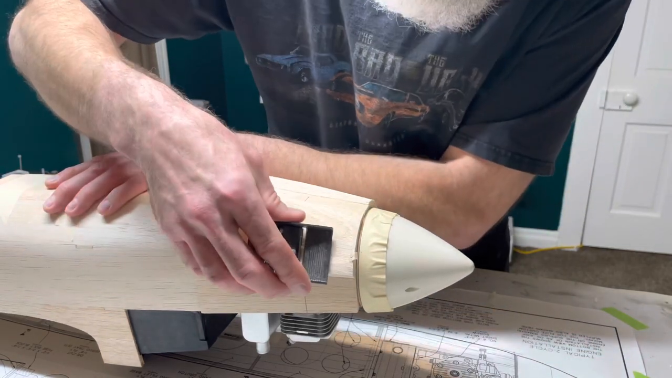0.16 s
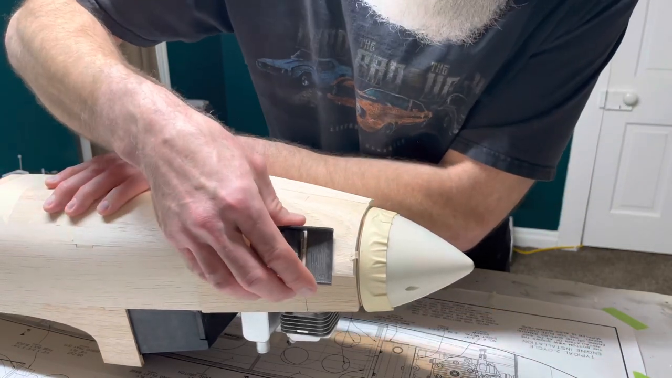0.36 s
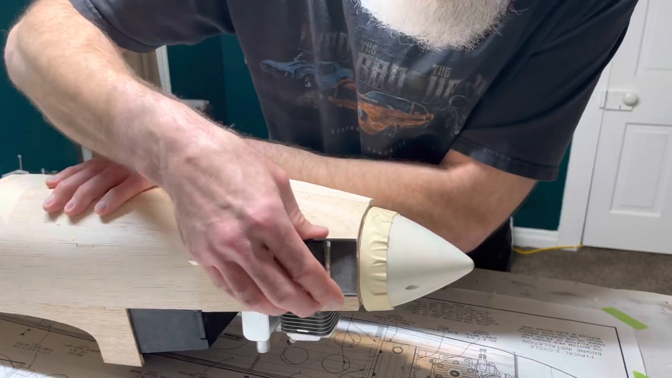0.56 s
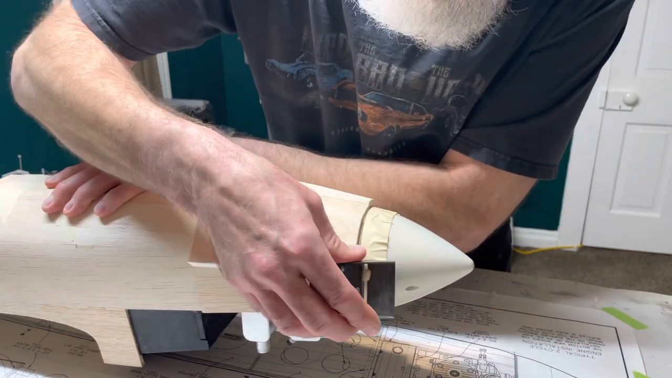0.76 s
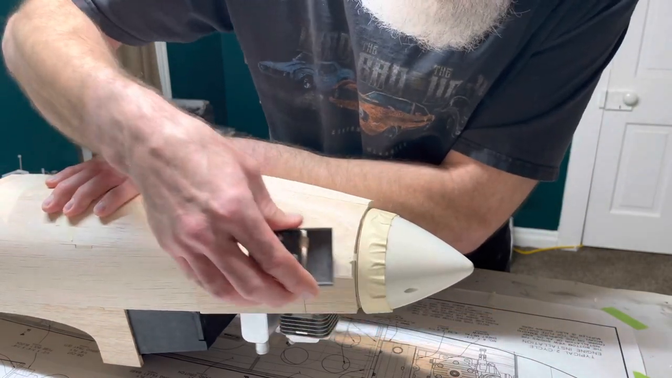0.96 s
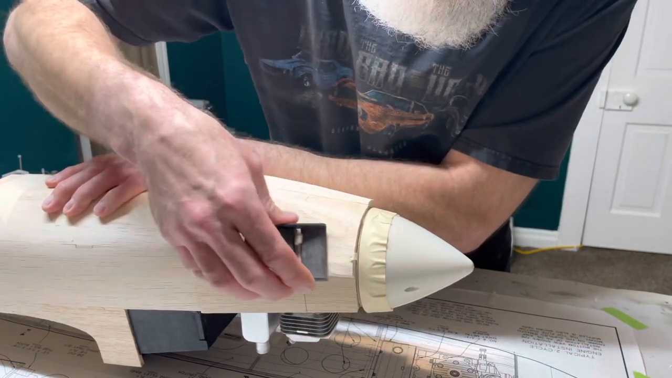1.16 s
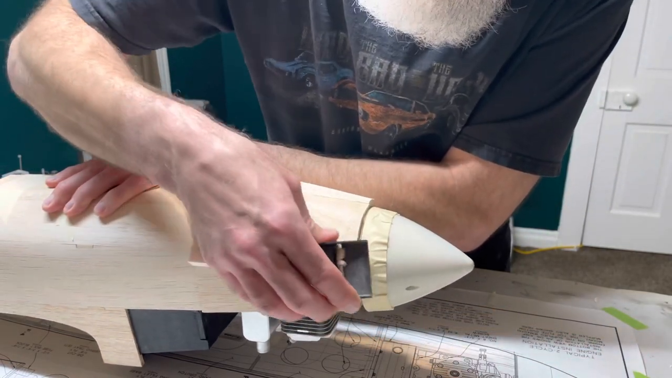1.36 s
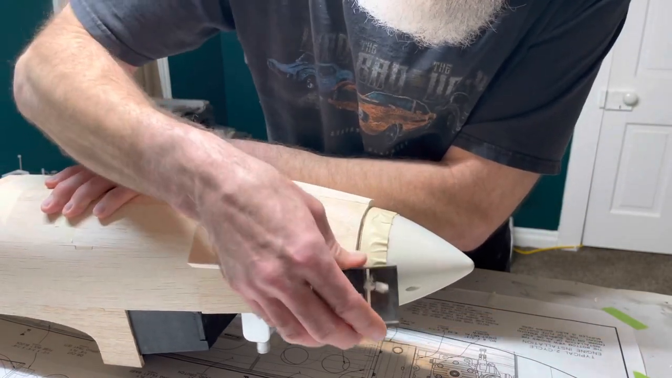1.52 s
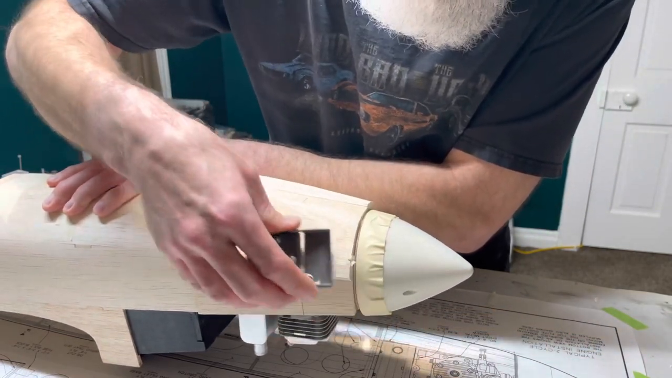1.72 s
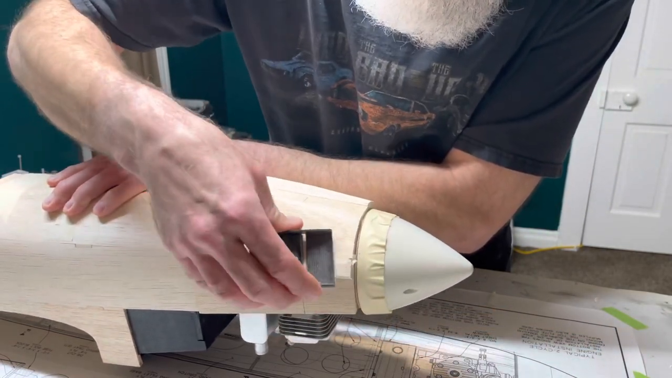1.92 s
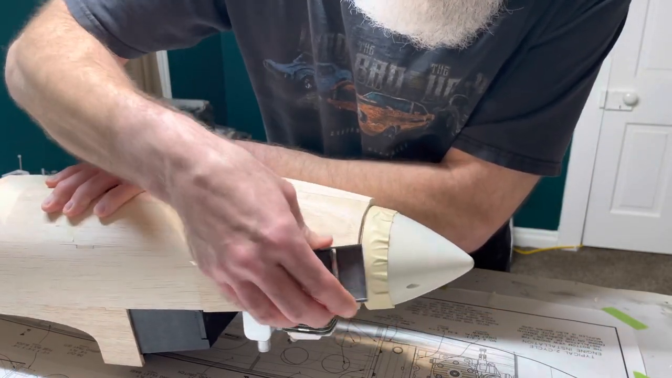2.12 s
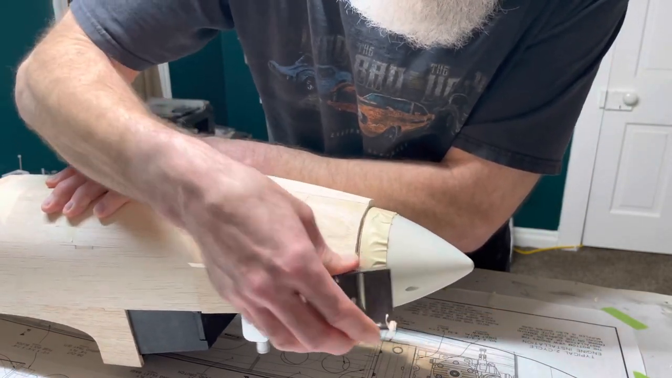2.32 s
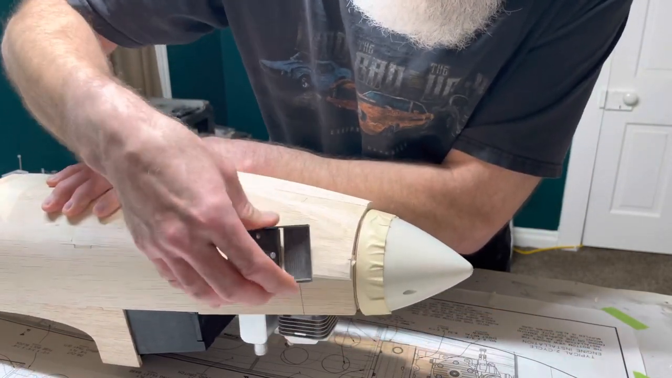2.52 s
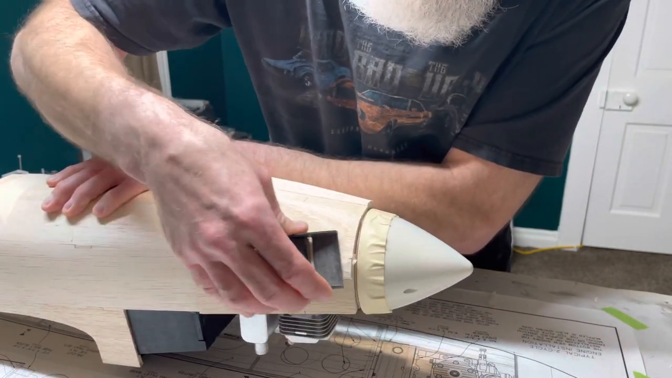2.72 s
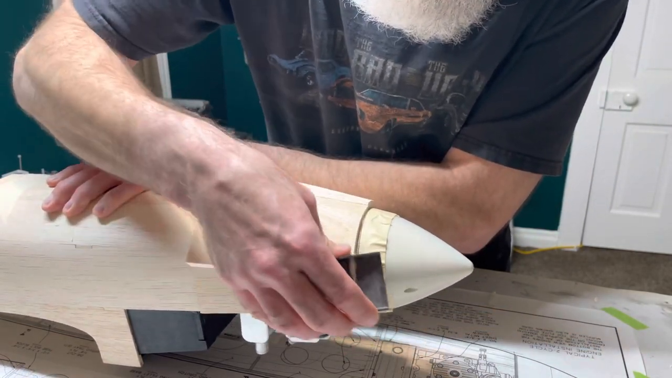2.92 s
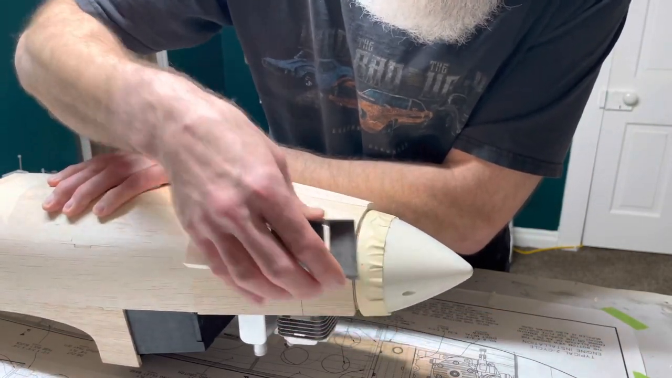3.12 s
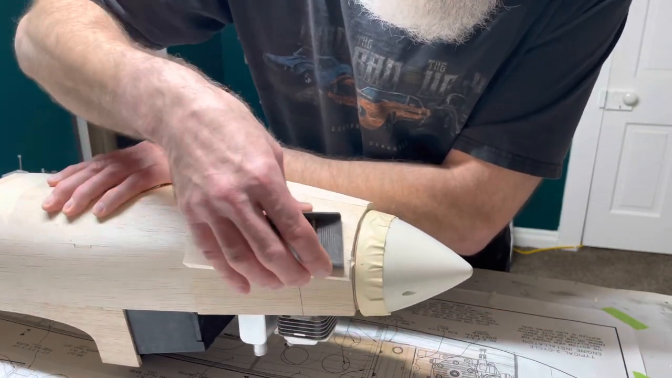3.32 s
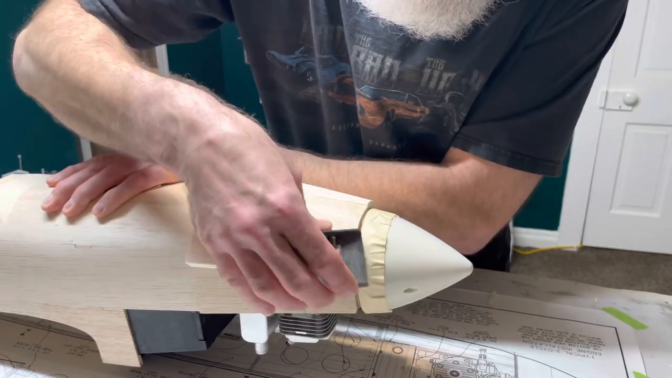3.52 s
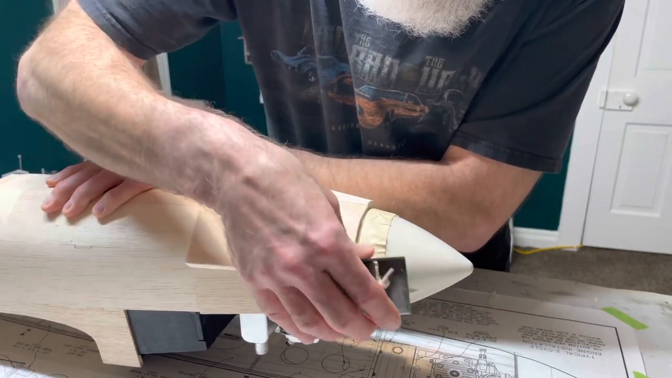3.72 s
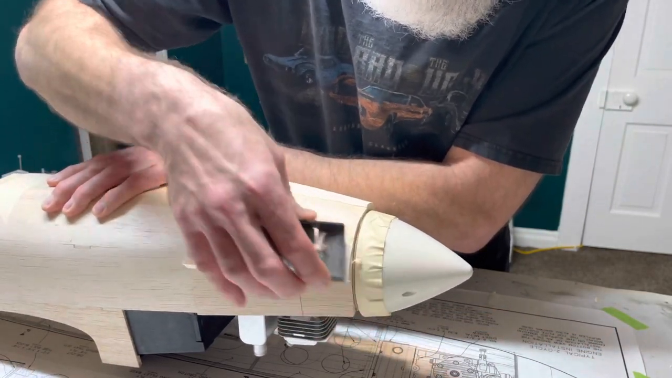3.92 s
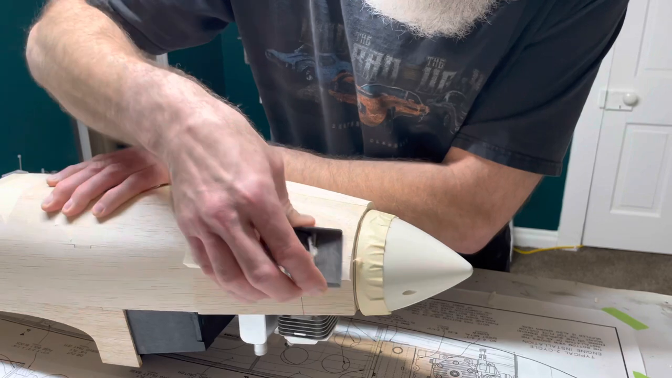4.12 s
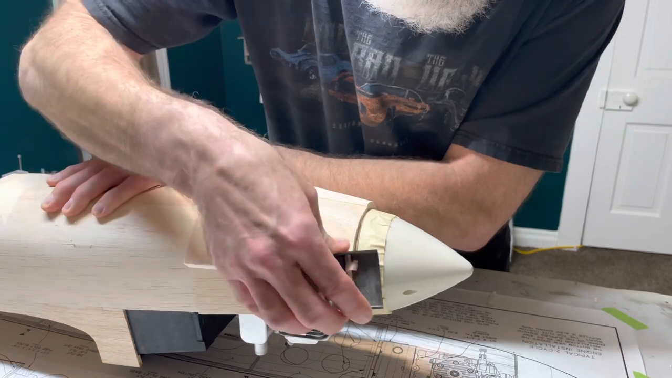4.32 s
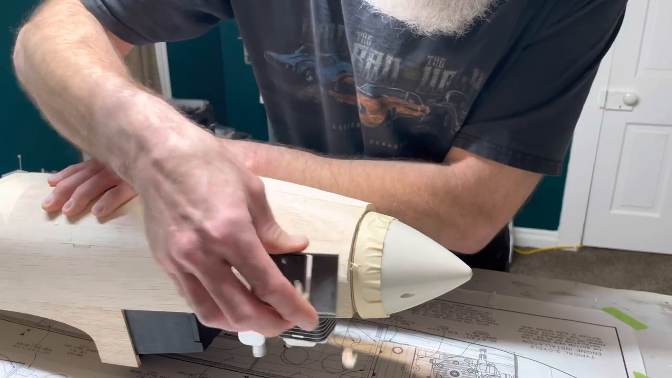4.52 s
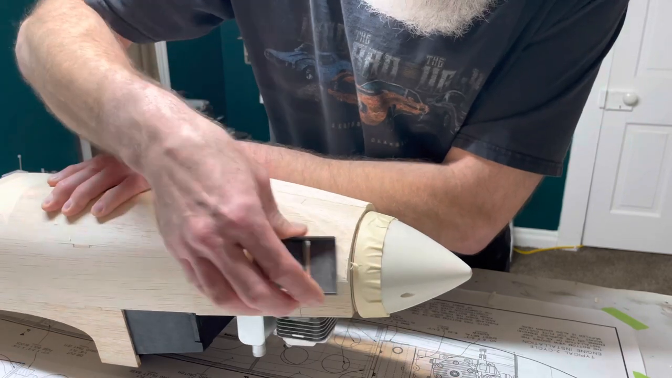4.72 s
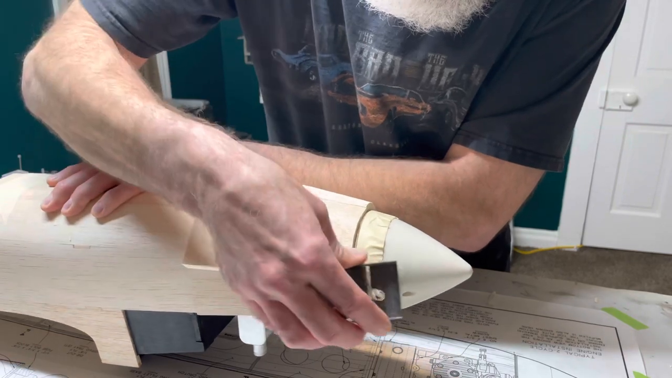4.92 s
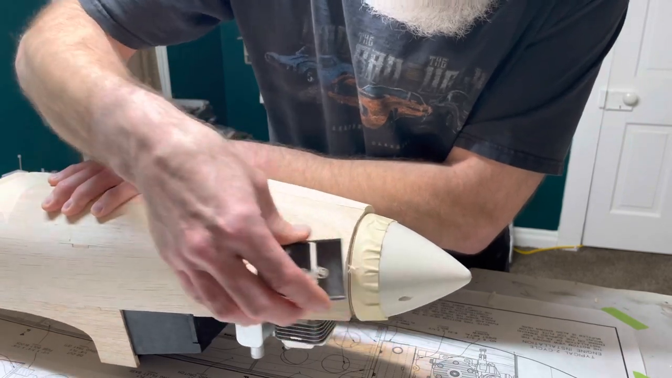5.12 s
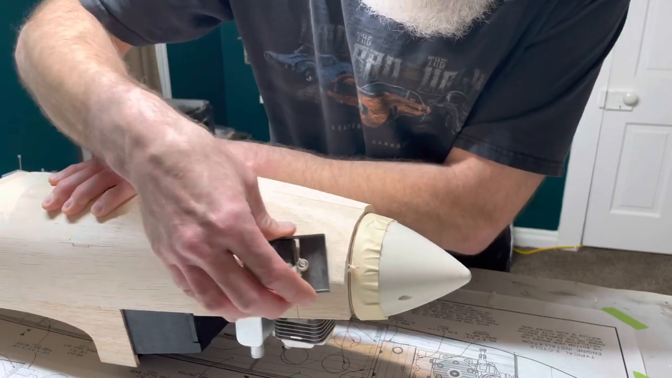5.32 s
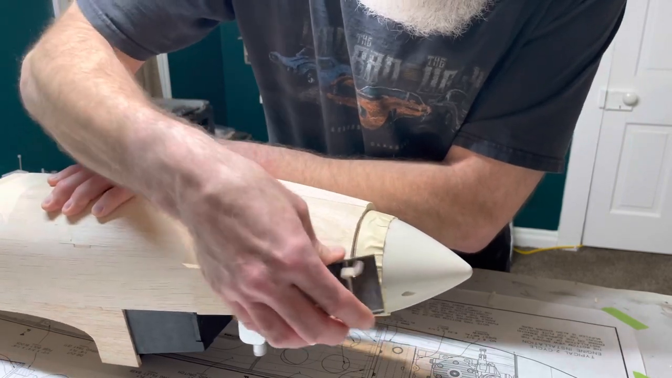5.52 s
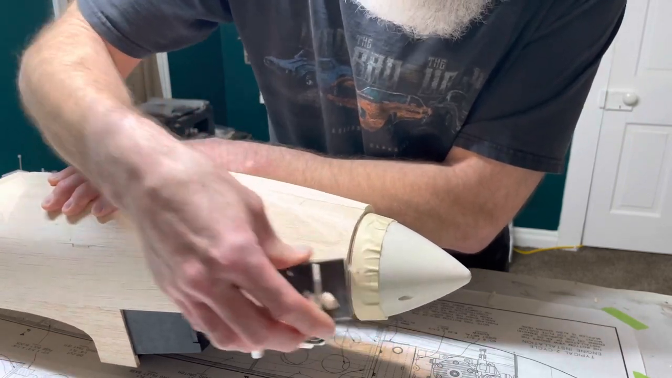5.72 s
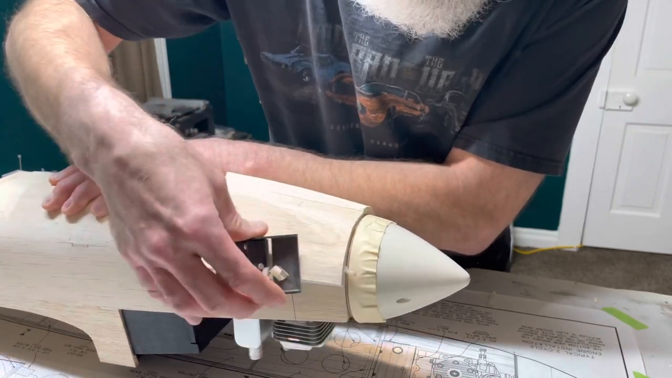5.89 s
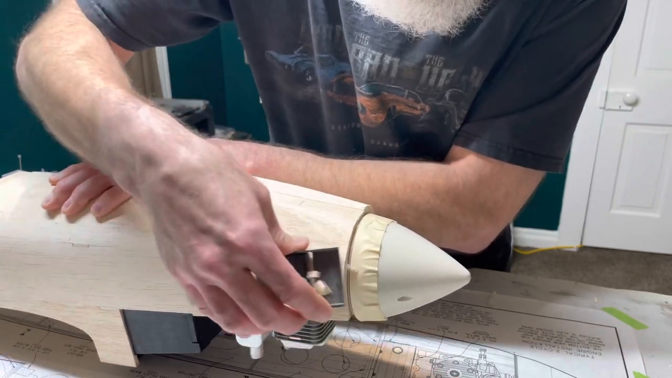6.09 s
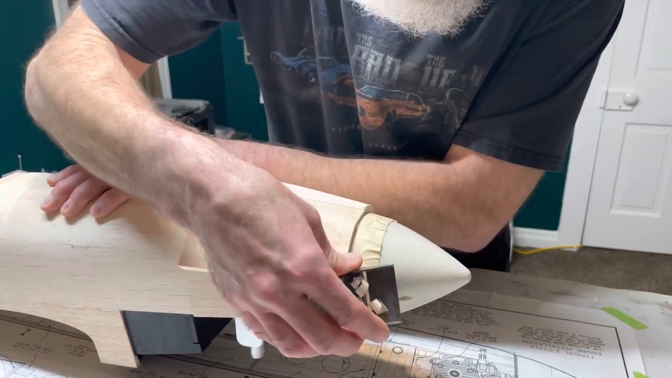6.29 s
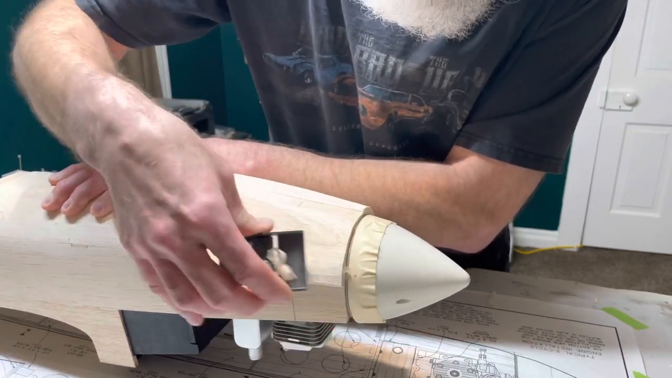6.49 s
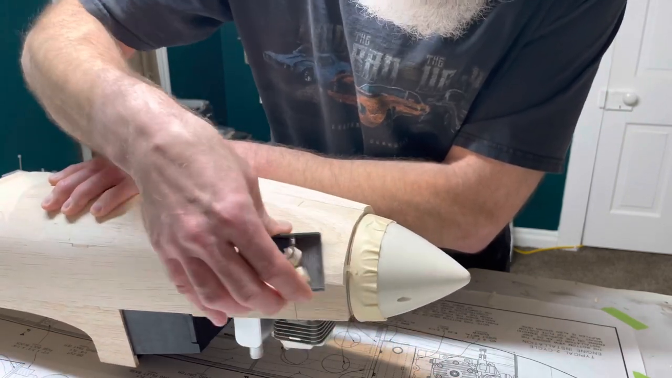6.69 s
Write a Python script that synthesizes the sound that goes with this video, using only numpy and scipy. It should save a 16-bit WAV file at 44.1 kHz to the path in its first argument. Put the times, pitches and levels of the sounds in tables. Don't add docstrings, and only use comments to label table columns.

```python
import sys
import numpy as np
from scipy import signal
from scipy.fft import rfft, irfft, next_fast_len
from scipy.io import wavfile
from scipy.ndimage import uniform_filter1d, map_coordinates

SR = 44100
rng = np.random.default_rng(int(sys.argv[2]) if len(sys.argv) > 2 else 0)


def store_wav(level_fs):
    pcm = np.round(np.clip(np.atleast_2d(level_fs), -1, 1) * 32767)
    wavfile.write(sys.argv[1], SR, pcm.T.astype(np.int16))


def boost(x):
    u = np.asarray(x, float) / 20
    return 10 ** u


N = 297675
TIME = np.arange(N) / SR


def noise():
    return rng.standard_normal((2, N))


def unit(x):
    return x / np.sqrt(np.mean(np.mean(x, axis=0) ** 2) + 1e-20)


def along(points, hz):
    f, *cols = np.transpose(points)
    return [np.interp(np.log(hz + 1), np.log(f + 1), c) for c in cols]


def wobble(rate):
    knots = rng.standard_normal(int(N * rate / SR) + 4)
    return map_coordinates(knots, [np.arange(N) * rate / SR])


def filtered(x, response):
    m = next_fast_len(N + 8192)
    return irfft(rfft(x, m) * response(np.fft.rfftfreq(m, 1 / SR)), m)[..., :N]


def coloured(x, points):
    return filtered(x, lambda f: boost(along(points, f)[0]))


def lift(peaks, f):
    return 1 + sum((boost(db) - 1) / (1 + (2 * (f - c) / w) ** 2) for c, w, db in peaks)


def patchy(x, depth_db):
    z = signal.stft(x, nperseg=1024)[2]
    field = uniform_filter1d(rng.standard_normal(z.shape), size=3, axis=1)
    field = uniform_filter1d(field, size=10, axis=2)
    return signal.istft(z * boost(depth_db * field / field.std()), nperseg=1024)[1][:, :N]


def ring(modes, t, near_hz=0, reach_hz=1e9, scatter_db=2):
    hz, db, t60 = np.transpose(modes)[:, :, None]
    luck = rng.standard_normal((2, 2, len(modes), 1))
    off_note_db = 6 * np.abs(hz - near_hz) / reach_hz
    size = boost(db + scatter_db * luck[0] - off_note_db - 60 * t / t60)
    phase = luck[1] * [[[0.15]], [[1.2]]]
    x = np.sum(size * np.sin(2 * np.pi * hz * t + phase), axis=1)
    return x / np.abs(x[0]).max()


def packet(t, hz, peak_s, half_s):
    return np.exp(-((t - peak_s) / half_s) ** 2) * np.sin(2 * np.pi * hz * t + [[0], [np.pi / 2]])


def attack(t, rise_s):
    return 1 - np.exp(-t / rise_s)


def piece(grain, s, t):
    return grain[:, round(s * SR):][:, :len(t)] / grain.std()


def add(track, s, x):
    part = track[:, round(s * SR):][:, :x.shape[1]]
    part += x[:, :part.shape[1]]


# f/Hz, level/dB
AIR = [(120, -21), (200, -14), (254, -18), (353, -3), (683, -6), (777, -12), (1160, -8), (2420, -19.5),
       (6880, -22.5), (16000, -39)]


def room_air():
    air = unit(coloured(patchy(noise(), depth_db=3.0), AIR))
    dull = filtered(air, lambda f: 1 / (1 + (f / 1600) ** 4) - 1 / (1 + (f / 330) ** 4))
    wakes_s, start_db = 0.31, -17
    held_db = start_db * np.clip(2 - 2 * TIME / wakes_s, 0, 1)
    return boost(-61) * (air + dull * (boost(held_db) - 1))


# f/Hz, level/dB
RUMBLE = [(13, -29), (22, -3.5), (54, 11), (103, 2.5), (130, -4), (166, -1), (194, 5), (220, -11),
          (290, -69), (480, -120)]
# f/Hz, width/Hz, level/dB
HUM = [(50.6, 37, 2), (80.4, 20, 1.5), (104, 3.7, 11.5), (149, 30, 7.5)]


def house_rumble():
    one, other = filtered(noise(), lambda f: boost(along(RUMBLE, f)[0]) * lift(HUM, f))
    rumble = unit(np.array([one + 0.31 * other, one - 0.05 * other]))
    settles_s, start_db = 0.51, -7
    swell_db = start_db * np.exp(-TIME / settles_s) + 1.0 * wobble(5.4)
    return boost(-58 + swell_db) * rumble


# t/s, f/Hz, level/dB
RUNDOWN = [(0, 168, -56), (.1, 173.4, -76.5), (.2, 168, -66), (.3, 133, -66), (.37, 101, -68),
           (.47, 98.3, -82), (.55, 91.2, -91)]


def rundown():
    s, hz, db = np.transpose(RUNDOWN)
    hz, db = np.interp(TIME, s, hz), np.interp(TIME, s, db)
    return boost(db + 6.0 + 2.0 * wobble(20)) * np.sin(2 * np.pi * np.cumsum(hz) / SR)


def whine():
    fade = np.clip((0.186 - TIME) / 0.08, 0, 1)
    return boost(-76 + 1.5 * wobble(25)) * fade * np.sin(2 * np.pi * 1140 * TIME)


def microphone_hiss():
    hiss = filtered(rng.standard_normal(N), lambda f: 1 / (1 + (7300 / (f + 1)) ** 6))
    return boost(-80) * hiss / hiss.std()


# deepest t/s, loss/dB, sinking/s
DUCKS = [(1.03, 2, 0.5), (1.75, -4.5, 0.092), (2.498, 3, 0.2), (3.733, 8, 0.017), (3.993, 18, 0.11),
         (6.39, 5, 0.13), (6.541, 5, 0.17)]


def ducking():
    loss_db = sum(db * np.clip(1 - (s - TIME) / slow, 0, 1) * (TIME < s) for s, db, slow in DUCKS)
    return boost(-loss_db)


# f/Hz, t60/s
ROOM = [(200, 0.45), (2000, 0.3), (6000, 0.2), (10000, 0.027)]


def room(x):
    hz, t, z = signal.stft(rng.standard_normal((2, SR // 2)), SR, nperseg=256)
    tail = signal.istft(z * boost(-60 * t / along(ROOM, hz)[0][:, None]), SR, nperseg=256)[1]
    late = np.pad(x[0], (300, 0))[None]
    return signal.fftconvolve(late, tail / np.linalg.norm(tail[0]), axes=1)[:, :N]


# f/Hz, likeness 0-1, left leads/rad, left louder/dB
PORTS = [(60, .97, 0, 0), (250, .7, .5, 3), (700, .6, .6, 5), (2000, .55, 1.1, 2), (2800, .6, 1.9, 2.5),
         (4000, .3, 3, 4.5), (7400, .3, 3.1, 4.5), (8400, .7, 3.14, 1.5), (9300, .93, 3.14, 0),
         (10100, .8, 2.8, 0), (10700, .75, 2.1, 0), (12000, .8, .7, 0), (12800, .99, 0, 0)]


def ports(pair):
    m = next_fast_len(N + 8192)
    alike, lead, louder_db = along(PORTS, np.fft.rfftfreq(m, 1 / SR))
    alike = np.clip(alike, 0, 1)
    a, b = rfft(pair, m)
    left = a * np.exp(0.5j * lead)
    right = (alike * a + np.sqrt(1 - alike ** 2) * b) * boost(-louder_db) * np.exp(-0.5j * lead)
    return irfft([left, right], m)[:, :N]


# t/s, level/dB, rise/s, t60/s
PUFFS = [
    (0.008, -70, 0.003, 0.053),
    (0.268, -70, 0.004, 0.19),
    (4.372, -42, 0.008, 0.05),
    (6.398, -63, 0.0012, 0.5),
]


def puffs():
    shape, t = np.zeros((1, N)), np.arange(SR // 3) / SR
    ticks = [(s - 0.0015, blade_db - 19, 0.0005, 0.0093) for s, _, blade_db in PANEL_HITS]
    for s, db, rise, t60 in PUFFS + ticks:
        fall_db = 60 * np.maximum(t - rise, 0) / t60
        add(shape, s, boost(db - fall_db)[None] * np.clip(t / rise, 0, 1))
    air = filtered(noise(), lambda f: 1 / (1 + (4000 / (f + 1)) ** 2) / (1 + (f / 14500) ** 10))
    return shape * air / air.std()


# start t/s, end t/s, lower note level/dB, upper note level/dB, dull scuff level/dB
RUBS = [(1.528, 1.758, -65.5, -77, -65), (2.298, 2.46, -60, -61.5, -61.5), (2.988, 3.163, -57, -58.5, -63),
        (3.346, 3.637, -57, -59, -58), (3.748, 3.94, -54, -57.5, -56.5),
        (4.357, 4.605, -65.5, -56.5, -57.5), (4.977, 5.138, -63, -59, -62), (5.661, 5.836, -65, -63.5, -71),
        (6.32, 6.36, -57, -52.5, -57)]
# f/Hz, width/Hz
RUB_NOTES = [(366, 6.6), (550, 42)]
# f/Hz, level/dB
SCUFF = [(80, -46), (160, -5), (300, 13), (600, -7), (1100, 10.5), (2500, -45)]


def rubs():
    out = np.zeros((2, N))
    notes = [unit(filtered(noise(), lambda f: 1 / (1 + (2 * (f - c) / w) ** 2))) for c, w in RUB_NOTES]
    notes.append(unit(coloured(noise() * boost(4 * wobble(30)), SCUFF)))
    for start, end, *levels in RUBS:
        fade = np.clip(np.minimum(TIME - start, end + 0.05 - TIME) / 0.027, 0, 1)
        on = fade > 0
        out[:, on] += fade[on] * sum(boost(db) * note[:, on] for db, note in zip(levels, notes))
    return out


# t/s, peak level/dB, favoured f/Hz, rattle level/dB
ROCKS = [
    (2.391, -25.5, 200, -17),
    (2.468, -42, 195, 12),
    (3.055, -31.5, 292, 4),
    (3.078, -23, 265, -3),
    (3.091, -26, 225, -18),
    (3.302, -26.5, 364, -1),
    (3.819, -23.5, 252, 0.5),
    (4.483, -22.5, 228, -3.5),
    (4.55, -30, 374, -16),
]
# f/Hz, level/dB, t60/s
STAND_MODES = [(100.7, -14, 0.65), (209.2, -9.5, 0.32), (283, -2.5, 0.06), (334, 2.5, 0.049),
               (396, -5.5, 0.28)]
# f/Hz, level/dB
RATTLE = [(250, -1), (450, -4.5), (900, 2.5), (1400, -31), (2500, -44)]


def rocks():
    out, t = np.zeros((2, N)), np.arange(SR // 3) / SR
    grit = coloured(noise() * boost(1.1 * wobble(90)), RATTLE)
    for s, db, hz, rattle_db in ROCKS:
        rattle = piece(grit, s, t) * (boost(-60 * t / 0.17) + 0.5 * boost(-60 * t / 0.015))
        knock = ring(STAND_MODES, t, near_hz=hz, reach_hz=65.4) * attack(t, 0.0031) ** 2
        thump = packet(t, 1.221 * hz, peak_s=0.0063, half_s=0.0031)
        knock = 0.91 * knock + 0.49 * thump
        add(out, s - 0.002, boost(db - 0.5) * (knock + boost(rattle_db - 16.0) * rattle * attack(t, 0.0053)))
    return out


# t/s, peak level/dB, t60/s, airy flick
# level/dB
RASPS = [(0.006, -57, 0.077, -25), (4.027, -46.5, 0.21, 0), (1.1144, -53, 0.17, 8.5),
         (1.565, -44, 0.18, -25), (1.8507, -48.5, 0.53, 3), (2.296, -37.5, 0.19, -7.5),
         (3.0006, -37, 0.14, -12), (3.7444, -36.5, 0.19, -9), (4.388, -38.5, 0.17, -8.5),
         (4.992, -40, 0.19, -12), (5.6775, -52, 0.3, -15), (6.334, -45.5, 0.12, -29)]
# f/Hz, level/dB
BREAK = [(600, -4), (1200, -1.5), (2000, 1.5), (2700, 5.5), (3500, 2), (5000, -4.5), (8000, -15),
         (15000, -38)]
# f/Hz, level/dB
BRIGHT = [(1500, -27), (2800, 5), (3500, 12.5), (5500, -8), (8000, -21), (15000, -40)]


def rasps():
    shape, t = np.zeros((3, N)), np.arange(SR // 3) / SR
    for s, db, t60, air_db in RASPS:
        body = boost(2.5 - 60 * t / t60) * (1 - 0.7 * np.exp(-t / 0.0065))
        flick = boost(air_db - 60 * t / 0.086)
        snap = boost(1.5 - 60 * t / 0.049)
        add(shape, s, boost(db - 2.0) * np.array([body, flick, snap]) * attack(t, 0.0008))
    grit = coloured(noise() * boost(0.85 * wobble(220)), BREAK)
    air = filtered(noise(), lambda f: 1 / (1 + (5000 / (f + 1)) ** 4) / (1 + (f / 13500) ** 10))
    bright = coloured(noise(), BRIGHT)
    return sum(envelope * x / x.std() for envelope, x in zip(shape, (grit, air, bright)))


# t/s, panel peak level/dB, blade peak level/dB
PANEL_HITS = [(0.1317, -60, -44), (1.035, -41, -38), (1.7543, -21, -29), (2.5062, -32, -35.5),
              (3.201, -22, -32.5), (3.999, -32, -53), (4.618, -20, -14.5), (5.196, -22, -23),
              (5.8628, -37, -30.5), (6.542, -28, -30)]
# f/Hz, level/dB, t60/s
PANEL_MODES = [(1080, -1, 0.04), (1136, 11, 0.063), (1100, 7, 0.081), (1330, 20.5, 0.0088)]
# f/Hz, level/dB, t60/s
BLADE_MODES = [(3378, -9, .06), (3700, -2, .014), (4100, -4, .01), (4850, -13, .025)]
# f/Hz, level/dB
CRACK = [(300, -31), (1500, 16), (4000, 13), (6500, 4.5), (9500, -11), (13000, -50.5), (16000, -80)]


def panel_and_blade():
    out, t = np.zeros((2, N)), np.arange(SR // 5) / SR
    grit = coloured(noise(), CRACK)
    for s, db, blade_db in PANEL_HITS:
        crack = piece(grit, s / 2, t) * (boost(-60 * t / 0.02) + 0.25 * boost(-60 * t / 0.13))
        click = (ring(BLADE_MODES, t) + 0.2 * crack) * attack(t, 0.002)
        add(out, s, boost(blade_db + 9) * click)
        add(out, s, boost(db + 1.0) * ring(PANEL_MODES, t) * attack(t, 0.00058))
    return out


# delay t/s, f/Hz, level/dB, half length/s
RETURNS = [(.0095, 350, 1, 0.0036), (0.027, 433, -4, 0.0065), (0.043, 430, -9.5, 0.0058),
           (0.053, 460, -14.5, 0.011), (.073, 430, -23.5, .005)]


def returns(t):
    delay, hz, db, half = np.transpose(RETURNS)[:, :, None]
    luck = rng.standard_normal((2, 2, len(RETURNS), 1))
    bell = np.exp(-((t - delay) / half) ** 2)
    wave = np.cos(2 * np.pi * hz * (t - delay) + luck[1])
    return np.sum(boost(db + 0.64 * luck[0]) * bell * wave, axis=1)


# t/s, peak level/dB, low modes level/dB, upper modes level/dB, favoured shell f/Hz
LANDINGS = [
    (0.133, -17.5, -5, -9, 740),
    (1.036, -24.5, 3, -6, 647),
    (1.754, -12, -8, -2, 713),
    (2.509, -12.5, -3.5, -5.5, 710),
    (3.202, -19.5, 0.5, -25, 740),
    (3.997, -21, -1.5, -25, 717),
    (4.619, -3.5, -18, 0.5, 672),
    (5.197, -11, -5, -7.5, 724),
    (5.864, -12.5, -2, -7, 707),
    (6.544, -10, -7, -1, 690),
]
# extra loss/dB per s, swell/s, reach of favoured note/Hz
GRIP = [(150, 0.0036, 41), (247, 0.0013, 72), (250, 0.0037, 47), (350, 0.0028, 60), (350, 0.0018, 39),
        (200, .002, 44), (110, 0.0024, 5.6), (247, 0.002, 30), (252, 0.0011, 33), (200, 0.0014, 48)]
# t/s, peak level/dB, low modes level/dB, favoured
# shell f/Hz
BOUNCES = [(1.7645, -18.5, -21, 660), (1.3, -34, -13, 560), (1.113, -40, 0, 740), (2.8, -38, -13, 640),
           (4.0245, -20.5, -5, 590), (4.643, -19.5, -7, 630), (5.208, -19.5, -26, 663),
           (5.256, -30, -6, 610), (5.884, -36, -16, 750), (4.8, -39, -7, 650), (3.3, -27.5, -8, 440),
           (5.4, -31, -10, 750), (4.664, -24, -20.5, 860), (4.674, -27.5, -29, 950), (4.1, -30, -23, 668),
           (6.596, -27, -10, 650), (1.816, -44, -10, 650), (3.25, -33, -2, 690)]
# extra loss/dB per s, swell/s, reach of favoured note/Hz
BOUNCE_GRIP = (290, 0.0014, 58)
# f/Hz, level/dB, t60/s
LOW_MODES = [(289, -25, 0.1), (320, 6, 0.1), (385, 9, 0.18), (316, -4, 0.16), (450, -6, 0.098)]
SHELL_MODES = [(545, -4, .1), (625, -2, .08), (660, -12, .2), (668, 0, .09), (740, 0, .055),
               (825, -2, .045)]
UPPER_MODES = [(1407, -11, 0.15), (1545, -5, 0.24), (1646, -4, 0.12), (1663, -5, 0.24), (1726, -4, 0.19),
               (1850, 11.5, 0.023), (1900, 12, 0.022), (2010, 4, 0.028), (2230, 0, 0.03),
               (2200, -17.5, 0.056)]
# f/Hz, level/dB
THUD = [(200, -14), (330, 3.5), (700, 14), (900, 2.5), (1200, -7), (1900, -7), (3000, -29.5)]


def taps():
    out, t = np.zeros((2, N)), np.arange(SR // 5) / SR
    wood = coloured(noise(), THUD)
    flutter = boost(3 * wobble(110) - 0.3)
    bounces = [(s, db, low_db, -15.5 - 0.35 * (db + 12), hz) for s, db, low_db, hz in BOUNCES]
    grips = GRIP + [BOUNCE_GRIP] * len(bounces)
    for (s, db, low_db, upper_db, hz), (grip, swell, reach_hz) in zip(LANDINGS + bounces, grips):
        shell = ring(SHELL_MODES, t, near_hz=hz, reach_hz=reach_hz, scatter_db=0) * attack(t, swell) ** 2
        ping = packet(t, hz, peak_s=0.004, half_s=0.0029)
        crush = piece(wood, s / 2, t) * boost(-60 * t / 0.18) * attack(t, 0.0013)
        shell = 0.73 * shell + 0.34 * ping + 0.14 * crush
        low = boost(low_db - 7.5) * ring(LOW_MODES, t) * attack(t, 0.0053)
        wave = boost(low_db - 9.5) * returns(t)
        upper = ring(UPPER_MODES, t, scatter_db=4) * attack(t, 0.002)
        upper = upper * flutter[round(s * SR / 2):][:len(t)] * boost(upper_db - 0.12 * grip * t)
        add(out, s - 0.0012, boost(db + 1.0) * (boost(-grip * t) * (shell + low) + wave + upper))
    return out


# start t/s, end t/s, level/dB, first f/Hz, last f/Hz
SINGS = [(0.392, 0.723, -53.5, 684, 740), (1.98, 2.06, -52, 664, 740), (2.138, 2.237, -43.5, 740, 807),
         (4.373, 4.405, -50, 648, 640), (4.749, 4.825, -40, 697, 677), (5.343, 5.547, -42, 680, 740),
         (5.994, 6.05, -44, 677, 715), (6.071, 6.154, -37, 685, 734), (6.186, 6.23, -39.5, 755, 733)]


def sings():
    out = np.zeros((2, N))
    waver = np.array([wobble(60), wobble(60)])
    flutter = boost(5.2 * np.array([wobble(49), wobble(49)]))
    for start, end, db, first_hz, last_hz in SINGS:
        fade = np.clip(np.minimum(TIME - start + 0.018, end + 0.013 - TIME) / 0.016, 0, 1)
        on = fade > 0
        hz = np.interp(TIME[on], [start, end], [first_hz, last_hz]) + 22 * waver[:, on]
        out[:, on] += boost(db + 3) * fade[on] * np.sin(2 * np.pi * np.cumsum(hz, axis=1) / SR)
    return flutter * out


# centre t/s, loss/dB before each layer's slope,
# half length/s
SKIPS = [(2.115, 6, 0.1), (2.72, 5.5, 0.076), (4, 2, 0.056), (6.13, -1.5, 0.043), (3.4, 0.5, 0.037),
         (3.5, -3.5, 0.049), (4.645, 12.5, 0.031), (6.7, -5, 0.07), (6.555, 0, 0.05), (2.81, 1.5, 0.062),
         (2.1, -2, 0.065), (4.9, -7, 0.018), (10, -5.5, 0.044)]


def skips():
    return -sum(db * np.clip(1 - np.abs(TIME - s) / half, 0, 1) for s, db, half in SKIPS)


# bite t/s, lift t/s, pressure level/dB at bite, at lift, shell note level/dB over tearing
PASSES = [
    (0.39, 0.709, -52.5, -43, 1.5),
    (1.137, 1.476, -48.5, -45.5, 1),
    (1.883, 2.215, -47.5, -42, -0.5),
    (2.635, 2.948, -46.5, -44.5, 1),
    (3.293, 3.64, -51.5, -45.5, -2.5),
    (4.114, 4.314, -45, -44, -1),
    (4.757, 4.868, -41, -41, -1.5),
    (5.335, 5.543, -45, -43, 0.5),
    (5.99, 6.213, -46.5, -41, 1),
    (6.642, 6.8, -47, -40, 0),
]
# sinking in/dB per s, leaving/dB per s, boom level/dB, hiss level/dB
EDGES = [(146, 227, -1.5, -0.5), (498, 194, -5.5, -1.5), (400, 246, -1.5, -2), (244, 257, -2, -1.5),
         (158, 144, -1, -3.5), (200, 280, -2.5, -2), (150, 220, -2, -1), (300, 321, 0.5, -1.5),
         (142.4, 235, 0.4, -1.5), (172, 200, -2.5, -1.5)]
SWELL = [3.5, 1, -2.5, 1.5, -10, 2, -2.5, -6.5, -2, 2]


def pressure():
    push, progress = np.full(N, -90.0), np.zeros(N)
    out, colour = np.ones(N), np.zeros((4, N))
    for one_pass, edges, swell_db in zip(PASSES, EDGES, SWELL):
        bite, off, first_db, last_db, shell_db = one_pass
        sink, leave, boom_db, hiss_db = edges
        u = np.clip((TIME - bite) / (off - bite), 0, 1)
        since = np.maximum(TIME - off, 0)
        db = first_db + (last_db - first_db) * u - sink * np.maximum(bite - TIME, 0)
        db += np.maximum(-leave * since, -12.5 - 61 * since)
        on = db > push
        push[on], progress[on] = db[on], u[on] ** 2
        out[on] = np.minimum(since[on] / 0.051, 1)
        colour[:, on] = [[shell_db], [boom_db], [0], [hiss_db]]
        colour[1, on] += swell_db * progress[on]
    return push + skips(), progress, out, colour


# first f/Hz, last f/Hz, width/Hz, level/dB
MOUTH = [(3820, 4270, 390, 5), (2500, 2750, 130, 1.5), (4820, 5000, 330, 1)]


def mouth(x, progress):
    hz, t, z = signal.stft(x, SR, nperseg=1024)
    full = np.minimum(1.54 * np.sqrt(np.interp(t, TIME, progress)), 1)
    gain = lift([(first + (last - first) * full, w, db) for first, last, w, db in MOUTH], hz[:, None])
    return signal.istft(z * gain, nperseg=1024)[1][:, :N]


# f/Hz, level/dB
FIBRES = [(120, -38), (220, -7.5), (700, -18), (1000, -14.5), (2500, -12), (5500, -16.5), (7500, -21.5),
          (9300, -15.5), (10500, -16.5), (12500, -17), (13600, -24), (15500, -27)]
# f/Hz, width/Hz, level/dB
BODY = [(287, 74, 8), (364, 38, 15), (518, 4.7, 8.5), (652, 26, 13.5), (740, 39, 11.5), (825, 34, 11.5),
        (1202, 123, 9), (1577, 54, 8.5), (1882, 160, 6.5), (2216, 13, 11), (3340, 20, 5.5),
        (6550, 970, 2.5)]
# level/dB at firm pressure, dB per dB of pressure, end gain/dB, blade-out loss/dB
LAYERS = [
    (-47.5, 1.27, 1, -5),
    (-55, 1.63, 9.5, -4.5),
    (-44, 1.01, 0.2, 0),
    (-49.5, 0.91, 1.5, 10),
]


def strokes():
    snaps_per_s, firm_db = 2500, -45
    snaps = (rng.random(N) < snaps_per_s / SR) * boost(3 * np.minimum(rng.exponential(size=N), 4))
    snaps = snaps / snaps.std() * rng.choice([-1, 1], (2, N))
    judder = boost(1.0 * wobble(40) + 0.5 * wobble(150))
    tear = patchy(judder * (noise() + 0.69 * snaps), depth_db=2.5)
    push, progress, out, colour = pressure()
    tear = mouth(tear, progress)
    cut = ports(filtered(tear, lambda f: boost(along(FIBRES, f)[0]) * lift(BODY, f)))

    def below(f, edge_hz):
        return 1 / (1 + (f / edge_hz) ** 8)

    bands = [lambda f: below(f, 900) - below(f, 480), lambda f: below(f, 480),
             lambda f: below(f, 8500) - below(f, 900), lambda f: 1 - below(f, 8500)]
    mix = 0
    for (db, slope, end_db, out_db), own_db, band in zip(LAYERS, colour, bands):
        level_db = db + slope * (push - firm_db) + end_db * progress - out_db * out + own_db
        mix = mix + boost(level_db) * unit(filtered(cut, band))
    return mix


def scene():
    knocks = taps() + panel_and_blade() + rocks() + rasps()
    close = knocks + boost(-12.5) * room(knocks) + rubs() + sings() + puffs()
    work = strokes() + ports(close)
    ducked = ducking() * (work + room_air() + microphone_hiss())
    opens = np.clip(TIME / 0.0028 - 0.01 / 0.0039 + 1, 0.1, 1)
    return opens * (ducked + house_rumble() + rundown() + whine())


def low_pass(x):
    return signal.sosfilt(signal.butter(12, 16320, fs=SR, output="sos"), x)


# f/Hz, width/Hz, level/dB
NOTCHES = [(5660, 220, -10.5), (4460, 190, -2), (5930, 260, 3), (6730, 95, 5.5)]


def record(dry):
    mix = filtered(dry, lambda f: (f < 15830) * lift(NOTCHES, f))
    return low_pass(mix)


dry = scene()
out = record(dry)
store_wav(out)
```